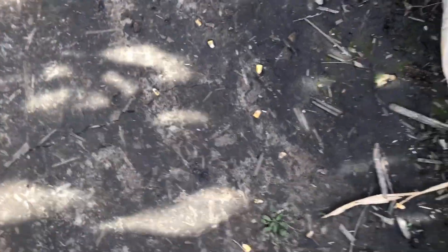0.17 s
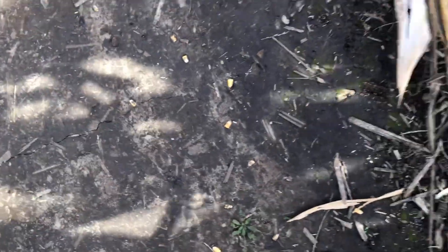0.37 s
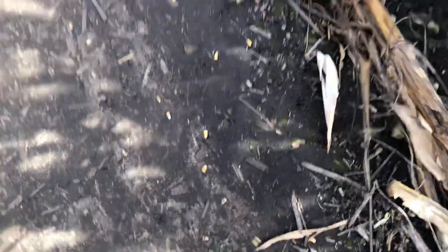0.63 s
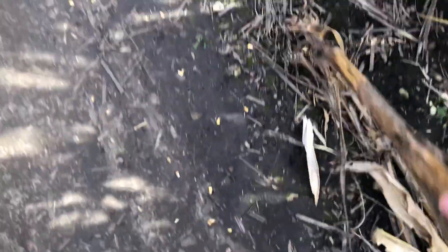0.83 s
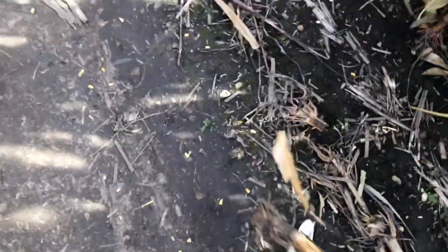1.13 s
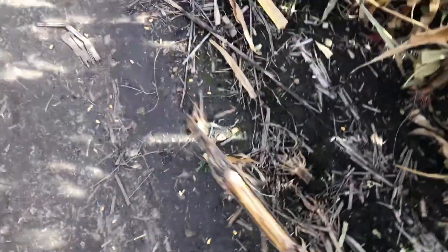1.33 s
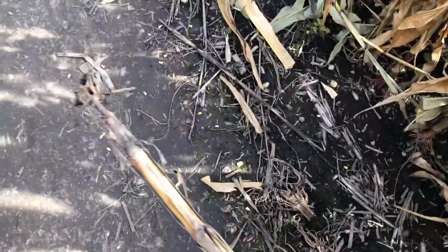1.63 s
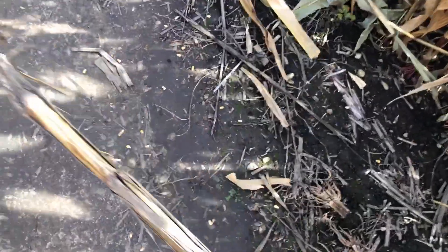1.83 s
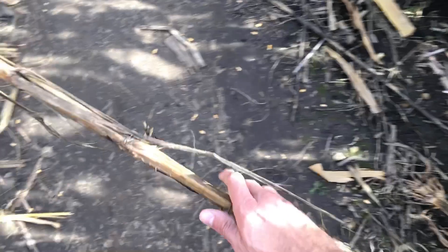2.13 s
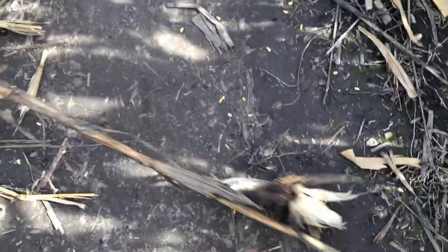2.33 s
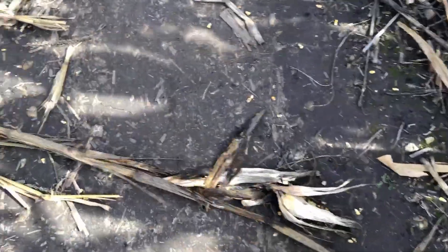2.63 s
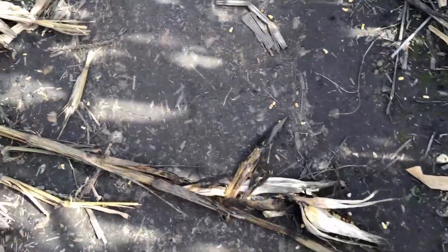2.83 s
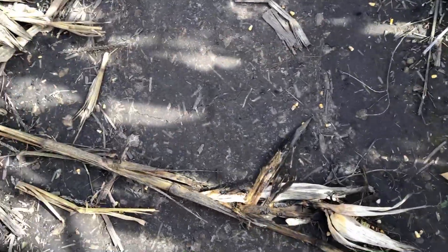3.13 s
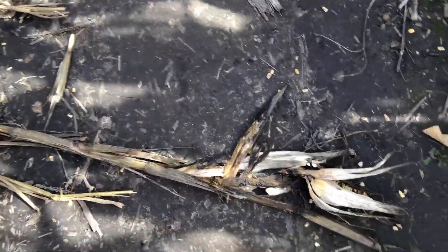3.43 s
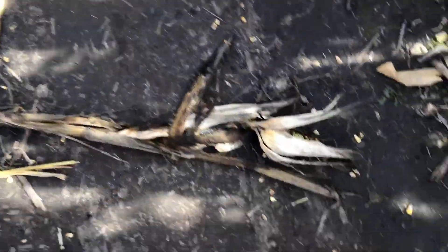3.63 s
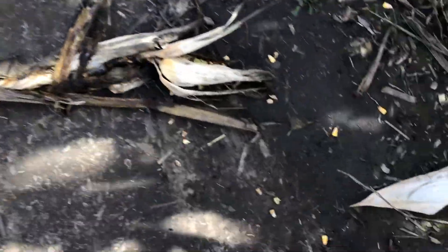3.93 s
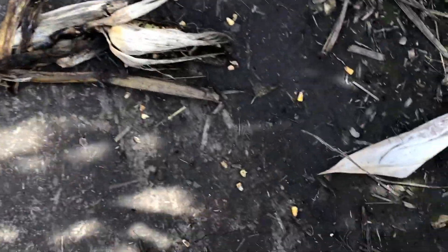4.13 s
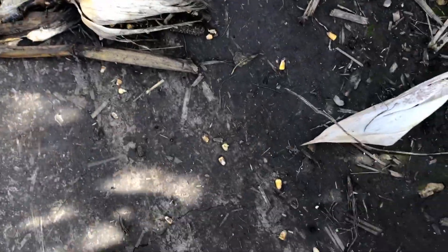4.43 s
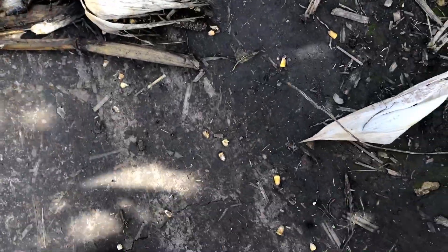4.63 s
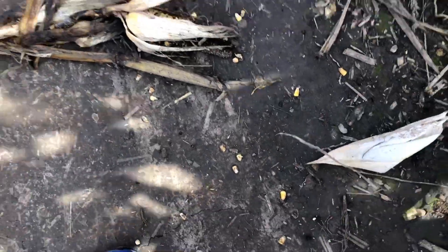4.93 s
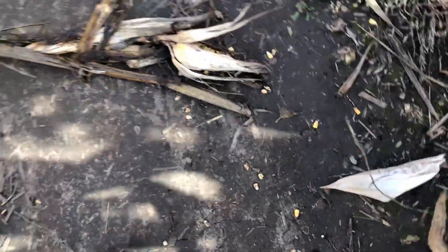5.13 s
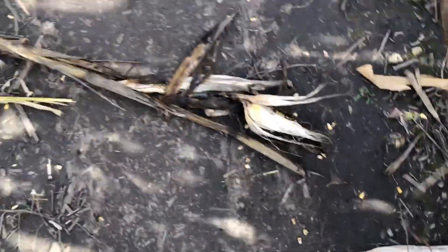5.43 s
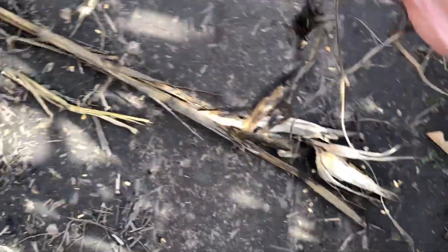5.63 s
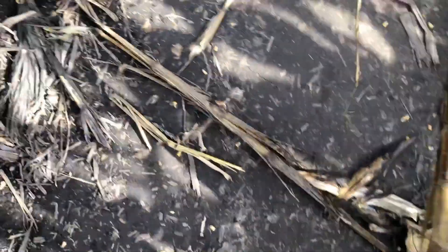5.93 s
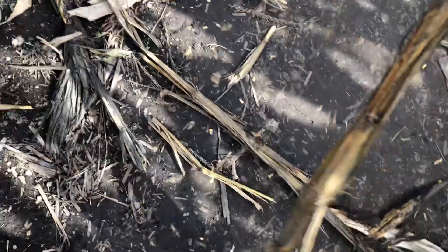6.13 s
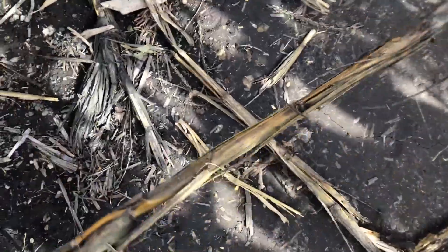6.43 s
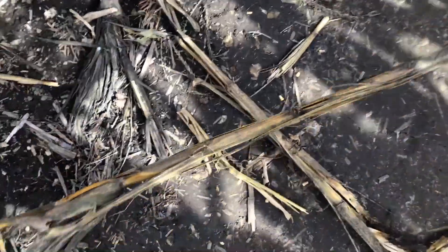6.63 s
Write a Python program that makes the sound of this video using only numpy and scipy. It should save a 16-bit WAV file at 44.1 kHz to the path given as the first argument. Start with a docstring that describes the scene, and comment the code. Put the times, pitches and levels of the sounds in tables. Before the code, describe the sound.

Dry husks crackle and snap close to a phone's microphone on a dirt path in a corn field. A hollow stalk knocks as it is dragged, a few small metal pieces jingle, and the stalk lands with a crunch. After a quieter moment the rustling returns louder, with more snaps and knocks. A breeze in the leaves builds over a faint distant motor hum, ending in gusts on the microphone.

```python
"""A breeze hisses through a dry corn field, and a motor hums far off. From the start, husks rustle
and snap as feet shift in the litter and a hand drags a hollow stalk over the dirt path, knocking it
and bumping the soil. A few small metal pieces jingle, mostly between 1 and 2 s. At about 2.4 s the
stalk drops with a crunch. After 4 s the husks rustle louder while the breeze grows, and in the last
second and a half gusts puff on the phone's one microphone."""
import sys
import numpy as np
from scipy import signal
from scipy.fft import rfft, irfft, next_fast_len
from scipy.io import wavfile
from scipy.ndimage import uniform_filter1d, map_coordinates

SR = 44100
rng = np.random.default_rng(int(sys.argv[2]) if len(sys.argv) > 2 else 0)


def put_to_file(sound):
    """Save the sound as 16-bit audio at rate SR, in the file named by the first command-line argument."""
    columns = np.atleast_2d(sound).T  # one column per channel
    safe = np.clip(columns, -1, 1)
    whole_steps = np.round(safe * 32767)
    wavfile.write(sys.argv[1], SR, whole_steps.astype(np.int16))


N = 299483


def amp(db):
    """Turn a level in dB into a number to multiply by."""
    return 10 ** (np.asarray(db) / 20)


def unit(x):
    """Scale a signal so that its average size (rms) is 1."""
    return x / np.sqrt(np.mean(x ** 2) + 1e-20)


def curves(rows):
    """Join rows of (time, values...) with straight lines: one curve for each column of values."""
    times, *columns = np.transpose(rows)
    return [np.interp(np.arange(N) / SR, times, column) for column in columns]


def wobble(per_s):
    """A smooth curve through per_s random values a second."""
    return map_coordinates(rng.standard_normal(int(N * per_s / SR) + 4), [np.arange(N) * per_s / SR])


def filtered(x, response):
    """Multiply each frequency in x by the gain that response gives for it."""
    size = next_fast_len(N + 8192)
    return irfft(rfft(x, size) * response(np.fft.rfftfreq(size, 1 / SR)), size)[..., :N]


def coloured(x, spectrum):
    """Shape the tone of x with rows of (f/Hz, level/dB), then scale it to rms 1."""
    freqs, db = np.transpose(spectrum)
    return unit(filtered(x, lambda hz: amp(np.interp(np.log(hz + 1), np.log(freqs), db, left=-120))))


def patchy(patchy_db, tilt_db=None):
    """Hiss with random louder and softer patches; tilt_db turns the treble up or down, per octave."""
    hz, t, spectra = signal.stft(rng.standard_normal(N + 256), SR, nperseg=256)
    patches = uniform_filter1d(uniform_filter1d(rng.standard_normal(spectra.shape), 6, 0), 8, 1)
    gain_db = patchy_db * unit(patches)
    if tilt_db is not None:
        octaves = np.log2(np.maximum(hz, 300) / 5000)[:, None]
        gain_db = gain_db + octaves * tilt_db[np.minimum((t * SR).astype(int), N - 1)]
    return signal.istft(spectra * amp(gain_db), SR, nperseg=256)[1][:N]


def crackle(tilt_db, per_s):
    """A hiss broken up by many tiny cracks of uneven size, each dying in a few milliseconds."""
    cracks = amp(rng.uniform(-0.98, 1, N) * 7.6) * (rng.random(N) < per_s / SR)
    fade = amp(-60 * np.arange(400) / SR / 0.01)
    grain = signal.fftconvolve(cracks, fade)[:N]
    return patchy(patchy_db=1.5, tilt_db=tilt_db) * (0.62 + 0.34 * unit(grain))


def stroke(s, held_s, db, rise_db_per_s, fall_db_per_s):
    """A curve in dB that rises until time s, holds and falls."""
    t = np.arange(N) / SR
    return db - rise_db_per_s * np.maximum(s - t, 0) - fall_db_per_s * np.maximum(t - s - held_s, 0)


def ring(tones, t, spread_db):
    """The fading tones of a struck object, each a little louder or softer every time."""
    return sum(amp(db + spread_db * rng.standard_normal() - 60 * t / fade_s) * np.sin(2 * np.pi * hz * t)
               for hz, db, fade_s in tones)


def add(track, s, sound):
    """Lay a sound on the track from time s."""
    part = track[round(s * SR):][:len(sound)]
    part += sound[:len(part)]


def pushes(rows):
    """Low pushes (t/s, level/dB, f/Hz), each swinging the microphone's membrane about twice."""
    out, t = np.zeros(N), np.arange(-SR // 25, SR // 25) / SR
    for s, db, hz in rows:
        swell = np.exp(-.5 * (t * hz / 0.54) ** 2)
        add(out, s + t[0], amp(db) * swell * np.sin(2 * np.pi * (hz * t + rng.random())))
    return out


def breeze():
    """One wind strength drives the far rush, the hiss of near leaves and a low rumble."""
    # wind strength, as the level of the leaf hiss: t/s, level/dB
    wind = [(0, -46), (.6, -45.5), (1.3, -45), (1.9, -46.5), (2.9, -45), (3.6, -42), (4.4, -41),
            (5.15, -36), (5.6, -38.5), (6.2, -38.5), (6.79, -39)]
    # the tone of each of the three noises: f/Hz, level/dB
    far_tone = [(180, -11), (300, -6), (600, -7), (1000, -4), (1600, -0.5), (2000, -2.5), (2600, -11.5),
                (4000, -31.5)]
    leaf_tone = [(500, -11), (1500, -9), (3000, 1), (5000, -0.5), (7500, -3.5), (9000, -5.5), (12000, -8),
                 (15500, -7), (17000, -2.5)]
    rumble_tone = [(20, -40), (35, -24), (55, -7), (85, -5), (130, -1.5), (160, -3.5), (230, -5.5),
                   (400, -25.5)]
    wind_db, = curves(wind)
    swell_db = wind_db - wind_db.mean()
    flutter = wobble(7)
    far = amp(-45.5 + 0.73 * swell_db + 0.29 * flutter) * coloured(patchy(patchy_db=1.55), far_tone)
    leaf_db = wind_db + 0.44 * flutter + 0.37 * wobble(25)
    leaves = amp(leaf_db) * coloured(patchy(patchy_db=1.38), leaf_tone)
    rumble_db = -53 + 0.61 * swell_db + 1.3 * wobble(6.2)
    rumble = amp(rumble_db) * coloured(rng.standard_normal(N), rumble_tone)
    return far + leaves + rumble


def motor():
    """A distant motor hums at its firing rate and an octave higher, a little unsteadily."""
    # how loud the hum is: t/s, level/dB
    hum = [(0, -69), (.8, -59), (2.3, -59.5), (2.8, -69), (3.6, -55), (4.6, -58.5), (5.2, -85), (6.79, -52)]
    level_db, = curves(hum)
    firing_hz = 56.35 + 1.58 * wobble(5)
    phase = 2 * np.pi * np.cumsum(firing_hz) / SR
    return amp(level_db + 1.8 * wobble(6.6)) * (np.sin(phase) + amp(-1.0) * np.sin(2 * phase))


def husks():
    """Dry husks stir and rub under hand and foot; the loudest movement sets level and brightness."""
    # stirring that never stops: t/s, level/dB, treble tilt/(dB per octave)
    stir = [(0, -66, -4), (.19, -44.5, 3.5), (1.45, -54, -2), (2.15, -48.5, -6.5), (2.3, -50.5, 3),
            (2.5, -37, -2.5), (2.7, -51, -4.5), (4.32, -41.5, -3.5), (4.64, -36, -2), (4.79, -41.5, 3),
            (4.845, -32, -0.5), (4.91, -31.5, 0), (5.05, -32.5, -1), (5.22, -30.5, 1.5), (5.42, -32.5, 0.5),
            (5.52, -44, 6), (5.65, -35, .1), (5.95, -36, 0.3), (6.79, -48, 3)]
    # short rubs: t/s, hold/s, level/dB, treble tilt/(dB per octave)
    rubs = [(.218, 0.011, -35.5, 1), (.345, 0.033, -36.5, -0.5), (.445, 0.032, -37, -2),
            (.627, .003, -41, 5.5), (.682, .012, -39.5, 1.1), (.824, 0.072, -35, 0), (.99, .035, -38.5, 2),
            (1.1, 0.031, -40.5, 4.5), (1.199, .003, -34, -2), (1.258, 0.0084, -36.5, 3.5),
            (1.311, .008, -34, -0.8), (1.41, 0.0054, -36.5, -2), (1.48, 0.048, -40, 7),
            (2.27, .004, -37.5, -5.5), (5.445, 0.038, -28.5, 1.2), (6.773, .02, -33.5, .1)]
    # the tone of a husk: f/Hz, level/dB
    husk_tone = [(150, -18), (400, -19), (1000, -7.5), (2000, -5.5), (4000, -2.5), (7000, -0.5), (9000, -5),
                 (12000, -3.5), (16000, -0.5)]
    level_db, tilt_db = curves(stir)
    for s, held_s, db, rub_tilt_db in rubs:
        rub_db = stroke(s, held_s, db, rise_db_per_s=553, fall_db_per_s=332)
        tilt_db = np.where(rub_db > level_db, rub_tilt_db, tilt_db)
        level_db = np.maximum(rub_db, level_db)
    return amp(level_db) * coloured(crackle(tilt_db, per_s=450), husk_tone)


def jingle():
    """Five metal pieces touch: each touch stops the last ringing and sets them ringing anew."""
    # touches: t/s, level/dB, the pieces a-e that are struck (strongest first)
    touches = [(.118, -47, "cde"), (1.016, -39, "cde"), (1.087, -38, "bcea"), (1.105, -34, "bdce"),
               (1.196, -22, "aedb"), (1.24, -35, "edb"), (1.253, -37, "bed"), (1.304, -26, "deba"),
               (1.454, -37, "be"), (1.478, -26.5, "dae"), (1.498, -35, "eda"), (1.507, -31, "eba"),
               (1.535, -31, "aeb"), (1.567, -37, "aeb"), (1.581, -27.5, "be"), (1.656, -43, "eb"),
               (1.705, -45, "e"), (1.925, -44, "ed"), (2.036, -39, "ed"), (2.828, -46.5, "bc")]
    # the tones of each piece: f/Hz, level/dB, time to fade by 60 dB/s
    pieces = [
        [(11117, -1, 0.24)],
        [(11377, -1.5, 0.18)],
        [(13600, 3, .16), (9150, 1, 0.14)],
        [(14470, 4, 0.048), (14300, -8, .04)],
        [(15365, 4, 0.056), (15050, -4, .04), (15650, -1, .04), (14750, -6, .03)],
    ]
    # how unevenly each piece rings while it shakes: spread/dB
    rattles = [2.2, 2.2, 3.6, 4.2, 4.6]
    next_piece_db, unstruck_db = -5, -21
    out, t = np.zeros(N), np.arange(SR // 4) / SR
    gaps_s = np.diff([row[0] for row in touches], append=N / SR)
    shake_times = t[::130]
    for (s, db, struck), gap_s in zip(touches, gaps_s):
        start_and_stop = (1 - np.exp(-t / 0.00056)) * amp(-60 * np.maximum(t - gap_s, 0) / .02)
        for name, tones, rattle_db in zip("abcde", pieces, rattles):
            share_db = next_piece_db * struck.index(name) if name in struck else unstruck_db
            shaken_db = rattle_db * np.interp(t, shake_times, rng.standard_normal(len(shake_times)))
            add(out, s, amp(db + share_db + shaken_db) * start_and_stop * ring(tones, t, spread_db=4.0))
    return out


def snaps():
    """Each dry fibre breaks with a very short crack and a weak scatter after it."""
    # breaking fibres: t/s, peak level/dB, centre f/Hz, width/octaves
    breaks = [(0.3463, -17.5, 7300, 0.98), (0.3972, -20, 10100, 0.88), (0.441, -23, 12900, 0.42),
              (0.51, -23, 7000, 0.55), (0.585, -26, 8000, .8), (0.6224, -15.5, 4140, 0.45),
              (0.6905, -15.5, 8000, 0.94), (0.7041, -17, 7500, 0.79), (0.8243, -6.5, 7500, 0.69),
              (0.8414, -22, 6500, 0.87), (0.8545, -10.5, 7800, 0.79), (0.8565, -9.5, 10700, 0.97),
              (0.8778, -12, 9300, .99), (0.8825, -11, 13300, 0.34), (1.0434, -21, 4000, 0.56),
              (1.0675, -18.5, 6560, 0.85), (1.1862, -22, 14800, 0.29), (1.196, -10.5, 8100, 0.9),
              (1.3049, -4, 9900, .99), (1.3166, -17, 10500, 0.27), (1.4992, -20.5, 3000, 0.32),
              (1.9257, -25, 10300, 0.99), (2.262, -25.5, 2200, 0.25), (4.5369, -10.5, 10600, 0.96),
              (4.6485, -16, 6800, 0.83), (4.864, -14.5, 6700, 0.92), (5.0094, -16.5, 10100, 0.63),
              (5.158, -14, 11200, 0.32), (5.7454, -22, 5300, 0.78), (6.774, -16, 10500, 0.54)]
    out, t = np.zeros(N), np.arange(SR // 20) / SR
    hz = np.fft.rfftfreq(len(t), 1 / SR) + 1
    bass_cut = hz ** 2 / (hz ** 2 + 2000 ** 2)
    for s, db, centre_hz, octaves in breaks:
        burst = (amp(-60 * t / 0.003) + 0.11 * amp(-60 * t / 0.051)) * rng.standard_normal(len(t))
        pitch_hump = 0.056 + np.exp(-.5 * (np.log2(hz / centre_hz) / octaves) ** 2)
        crack = irfft(rfft(burst) * pitch_hump * bass_cut, len(t))
        add(out, s, amp(db) * crack / np.abs(crack).max())
    return out


def knocks():
    """The hollow stalk rings briefly at each knock."""
    # knocks on the stalk: t/s, level/dB
    hits = [(.396, -35), (.4512, -31), (.461, -29), (.609, -39), (.6212, -42), (.703, -35), (.823, -17.5),
            (0.841, -30), (.855, -31.5), (1.0663, -34), (2.2608, -27.5), (4.6348, -30.5), (4.6473, -34),
            (5.714, -30), (5.791, -30), (6.7728, -25.5)]
    # the stalk's tones: f/Hz, level/dB, time to fade by 60 dB/s
    stalk_tones = [(1397, 5.5, 0.011), (1840, 2, 0.013), (2460, -6, 0.01)]
    out, t = np.zeros(N), np.arange(SR // 20) / SR
    onset = 1 - np.exp(-t / 0.00048)
    for s, db in hits:
        add(out, s, amp(db) * onset * ring(stalk_tones, t, spread_db=0.5))
    return out


def thuds():
    """The stalk bumps the soil with short, low thuds."""
    # bumps: middle t/s, peak level/dB, f/Hz
    bumps = [(0.8275, -32, 520), (0.8318, -32, 215), (2.2725, -33.5, 190), (2.4405, -37.5, 205),
             (2.4625, -38.5, 320)]
    return pushes(bumps)


def landing():
    """The stalk drops: its leaves crunch first, then the sound dulls as its weight settles."""
    # the tone of the dry litter on the ground: f/Hz, level/dB
    litter_tone = [(90, -35), (170, -8), (380, -8), (1000, 2), (2500, -2), (3200, -7.5), (5400, -4),
                   (16000, -10.5)]
    lands_s = 2.425
    level_db = stroke(lands_s, held_s=0.028, db=-29.5, rise_db_per_s=3004, fall_db_per_s=300)
    tilt_db = stroke(lands_s, held_s=0.0044, db=2, rise_db_per_s=0, fall_db_per_s=49)
    crunch = crackle(np.maximum(tilt_db, -.4), per_s=1800)
    return amp(level_db) * coloured(crunch, litter_tone)


def gusts():
    """Swirls of air roll over the microphone hole in lumps, with strong puffs and small random ones."""
    # wind across the hole: t/s, level/dB
    gust = [(5.4, -70), (6.03, -49), (6.15, -54), (6.4, -50), (6.6, -45), (6.7, -54), (6.79, -54)]
    # the tone of the swirls: f/Hz, level/dB
    swirl_tone = [(18, -40), (35, -5), (55, 6.5), (110, -14), (300, -26)]
    # the strongest puffs: middle t/s, peak level/dB, f/Hz
    strong_puffs = [(6.038, -33.5, 128), (6.3, -28.5, 184), (6.393, -34.5, 103), (6.438, -31, 167),
                    (6.499, -37, 106), (6.521, -30, 132), (6.557, -35.5, 98), (6.593, -33.5, 150),
                    (6.637, -38, 91), (6.704, -31, 139)]
    gust_s, gust_db = np.transpose(gust)
    when, pitch, size = rng.random(size=(16, 3)).T
    small_s = gust_s[0] + (gust_s[-1] - gust_s[0]) * when
    small_db = np.interp(small_s, gust_s, gust_db) + 7 + 6 * (size - .5)  # about 7 dB above the gust
    small_hz = 120 * 2 ** (.9 * (pitch - .5))
    puffs = pushes(strong_puffs + list(zip(small_s, small_db, small_hz)))
    level_db, = curves(gust)
    lumps = amp(4.8 * wobble(14))
    swirls = unit(lumps * coloured(rng.standard_normal(N), swirl_tone))
    return puffs + amp(level_db) * swirls


def scene():
    """All sounds reach one microphone, copied to both channels."""
    mono = breeze() + motor() + husks() + jingle() + snaps() + knocks() + thuds() + landing() + gusts()
    return np.array([mono, mono])


def record(dry):
    """The phone cuts off the very highest treble."""
    return filtered(dry, lambda hz: hz < 15850)


dry = scene()
out = record(dry)
put_to_file(out)
```